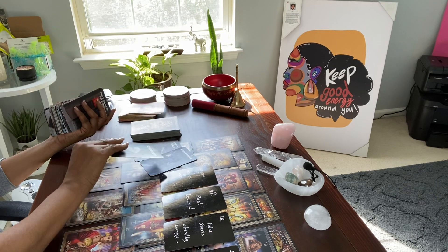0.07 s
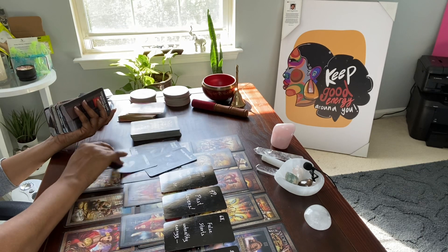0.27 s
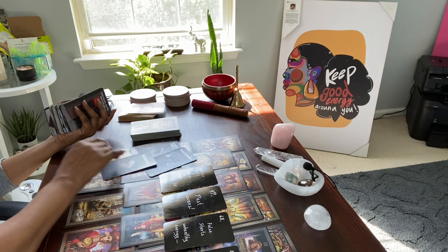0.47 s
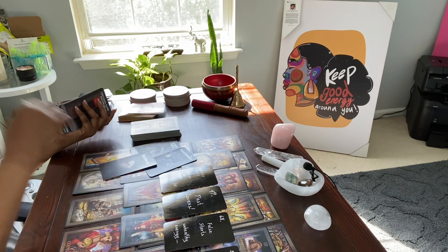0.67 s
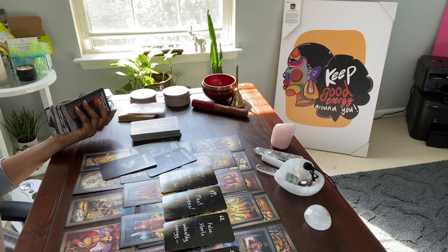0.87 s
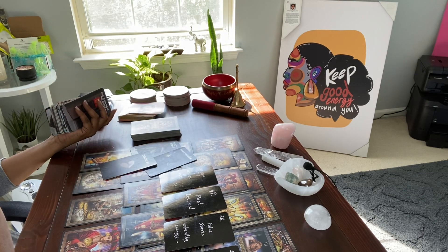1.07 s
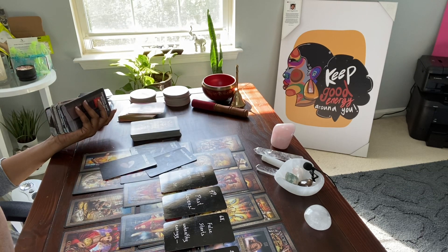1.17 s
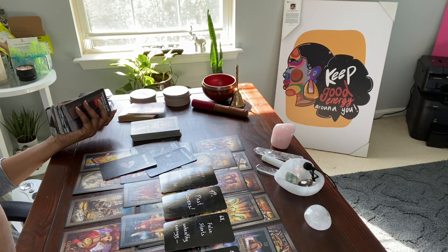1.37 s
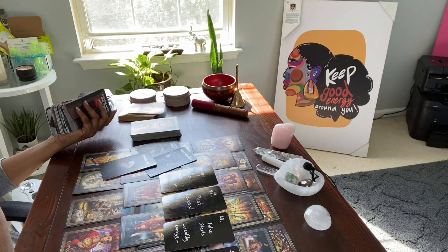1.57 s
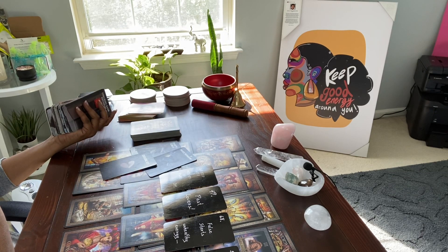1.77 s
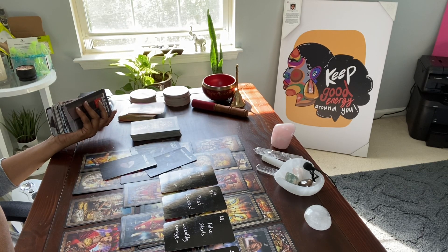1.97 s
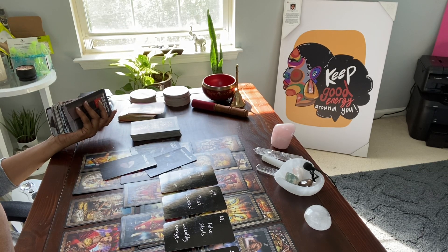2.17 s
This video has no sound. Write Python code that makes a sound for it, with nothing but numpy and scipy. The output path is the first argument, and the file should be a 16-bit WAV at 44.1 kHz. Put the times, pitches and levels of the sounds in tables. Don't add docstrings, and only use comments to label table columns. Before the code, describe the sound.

A playing card slaps onto a wooden table at about 0.32 seconds, after faint ticks and papery scuffs from 0.2. The snap is bright and crackly, with a short woody boom and brief room reflections. Then quiet: soft fan hum, low air rumble, a dull thud near 1.06, faint falling bird whistles until about 1.65, a small deck tick at 1.34, and light ticks and hand rustle from 2.0 to 2.2.

```python
import sys
import numpy as np
from scipy import signal
from scipy.fft import rfft, irfft
from scipy.io import wavfile
from scipy.ndimage import uniform_filter1d

SR = 44100
rng = np.random.default_rng(int(sys.argv[2]) if len(sys.argv) > 2 else 0)


def store_pcm(level_fs):
    pcm = np.round(np.clip(level_fs, -1, 1) * 32767).astype(np.int16)
    wavfile.write(sys.argv[1], SR, np.atleast_2d(pcm).T)


def how_loud(loudness_db):
    steps = np.asarray(loudness_db, float) / 20
    return 10 ** steps


N = 98166


def rms_one(x):
    return x / np.sqrt(np.mean(x ** 2) + 1e-20)


def at_hz(points, hz):
    table_hz, value = np.array(points).T[:2]
    return np.interp(np.log(hz), np.log(table_hz), value)


def colour(x, spectrum):
    hz = np.maximum(np.fft.rfftfreq(len(x), 1 / SR), 1)
    return rms_one(irfft(rfft(x) * how_loud(at_hz(spectrum, hz)), len(x)))


def band_noise(low_hz, high_hz, order, n):
    sos = signal.butter(order, [low_hz, high_hz], "band", fs=SR, output="sos")
    return signal.sosfilt(sos, rng.standard_normal(n))


def click(s, db):
    x = np.full(N, 1e-18)
    x[int(s * SR)] = how_loud(db)
    return x


def ring(clicks, hz, t60):
    r, w = how_loud(-60 / (t60 * SR)), 2 * np.pi * hz / SR
    return signal.lfilter([0, np.sin(w)], [1, -2 * r * np.cos(w), r * r], clicks)


def snap(s, db, hz, t60):
    t = np.arange(N) / SR - s
    crack = rng.standard_normal(N) * (t >= 0) * how_loud(db - 120 * np.maximum(t, 0) / t60)
    top_hz = min(2.0 * hz, .45 * SR)
    crackle = signal.lfilter(*signal.butter(2, top_hz, fs=SR), crack + 1e-18)
    return np.array([ring(click(s, db), hz, t60), crackle])


# [t/s, peak level/dB, card ring f/Hz, ring t60/s, push into the table level/dB]
CONTACTS = [(.3148, -8, 1700, .004, -13), (.3149, -13, 4200, .0025, -30), (.3150, -19, 8500, .002, -30),
            (.3192, -17, 1850, .010, -14), (.3202, -14, 1870, .010, -17), (.3216, -14, 14000, .0012, -30),
            (.3217, -9, 1860, .007, -18), (.3221, -6, 9400, .0024, -30), (.3239, -15, 3800, .003, -19),
            (.3254, -21, 14200, .003, -30), (.3306, -13, 5400, .004, -24), (.3322, -16, 7200, .0035, -22)]


def slap():
    return sum(snap(*row[:4]) for row in CONTACTS)


# [f/Hz, level/dB, t60/s]
TABLE = [(107, -26.5, 0.088), (219.2, -5.5, 0.028), (410, -13.5, 0.017), (508, -14, .04),
         (654.8, -15.5, 0.038), (745, -18.5, .05), (836, -20.5, .05), (1175, -10, 0.018),
         (1359.7, -19.5, 0.034)]


def table():
    pushes = sum(click(row[0], row[4]) for row in CONTACTS)
    soft_push = signal.lfilter([.2], [1, -.8], pushes)
    modes = sum(how_loud(db) * ring(soft_push, hz, t60) for hz, db, t60 in TABLE)
    return signal.lfilter(*signal.butter(2, 120, "high", fs=SR), modes)


# [t/s, peak level/dB, ring f/Hz, ring t60/s]
TICKS = [(.2018, -42, 3500, .008), (.2065, -50, 6500, .006), (.2020, -48, 900, .012),
         (.2110, -48, 4000, .010), (.2365, -48, 1850, .012), (.2783, -33, 2300, .010),
         (.2851, -39, 7200, .004), (.2851, -38, 2300, .005), (.3095, -30, 2900, .008),
         (1.3425, -42, 520, .030), (1.3428, -41, 800, .012), (1.3430, -51, 2300, .010),
         (1.9865, -46, 2200, .010), (1.9865, -48, 6400, .004), (1.9868, -49, 8900, .003),
         (2.0755, -53, 6500, .005)]


def ticks():
    rings, cracks = sum(snap(*row) for row in TICKS)
    return rings + how_loud(-12) * cracks


# [t/s, level/dB]
SLIDE = [
    (.198, -86),
    (.203, -52.5),
    (.23, -66),
    (.262, -66.5),
    (.28, -50),
    (.298, -63.5),
    (.311, -41.5),
    (0.322, -24.5),
    (.345, -47),
]
# [f/Hz, level/dB per Hz]
CARD = [(500, -13.5), (1200, 4), (2300, 7), (3500, -4.5), (7000, -5), (11000, -13), (15000, -19.5)]


def slide():
    grains_per_s, spread_db, end_s = 8000, 2.5, .012
    t, (s, db) = np.arange(N) / SR, np.transpose(SLIDE)
    hits = rng.random(N) < grains_per_s / SR
    sizes = how_loud(spread_db * np.minimum(rng.exponential(1, N), 4))
    grains = hits * sizes * rng.choice([-1, 1], N)
    stroke = how_loud(np.interp(t, s, db, left=-140)) * np.exp(-np.maximum(t - s[-1], 0) / end_s)
    return stroke * colour(grains, CARD)


# [f/Hz, t60/s]
ROOM_T60 = [(100, .17), (500, .2), (2000, .22), (5000, .21), (8000, .19), (11000, .145), (16000, .11)]
# [f/Hz, level/dB]
ROOM = [(100, -4.5), (300, 1.5), (1000, 3.5), (1500, 0), (2200, -1), (3200, -2), (5000, 4), (10000, -0.5),
        (16000, -2.5)]


def room(x):
    late_db, late_stretch = -12, 1.7
    peak_hz, peak_width_hz, peak_db = 2020, 350, -2
    onset_s, room_db = .009, -4
    t, edges = np.arange(SR // 2) / SR, 70 * 2 ** np.arange(0, 8.1, .5)
    tail = 0
    for low, high in zip(edges, edges[1:]):
        hz = np.sqrt(low * high)
        fall_db = -60 * t / at_hz(ROOM_T60, hz)
        decay = how_loud(fall_db) + how_loud(late_db + fall_db / late_stretch)
        tail = tail + band_noise(low, high, 2, len(t)) * how_loud(at_hz(ROOM, hz)) * decay
    peak = signal.iirpeak(peak_hz, peak_hz / peak_width_hz, fs=SR)
    tail = tail + how_loud(peak_db) * signal.lfilter(*peak, tail)
    tail = tail * (1 - np.exp(-(t / onset_s) ** 2))
    return how_loud(room_db) * signal.fftconvolve(x, tail / np.linalg.norm(tail))[:N]


# [middle t/s, half length/s, level/dB]
RUSTLES = [
    (1.25, 0.06, -83),
    (1.875, .05, -97),
    (2.01, .02, -85),
    (2.14, 0.028, -65),
    (2.21, .02, -68),
]
# [f/Hz, level/dB per Hz]
CLOTH = [(700, 6.5), (2200, 6.5), (4000, -2), (7000, 0), (10000, -10), (15000, -19)]


def rustles():
    t = np.arange(N) / SR
    swells = sum(how_loud(db) * np.exp(-((t - s) / half) ** 2) for s, half, db in RUSTLES)
    return swells * colour(rng.standard_normal(N), CLOTH)


# [start t/s, length/s, start f/Hz, end f/Hz, level/dB]
WHISTLES = [
    (.02, .17, 2840, 2420, -70),
    (.565, .185, 2830, 2440, -70),
    (.81, .09, 2170, 2080, -76),
    (.90, .07, 2780, 2850, -77),
    (1.02, .13, 2830, 2430, -70),
    (1.485, .08, 3420, 3030, -76),
    (1.565, .09, 2440, 2420, -71),
    (1.57, .07, 3120, 3080, -79),
    (1.28, .34, 2830, 2740, -81),
]


def bird():
    hold_share, fade_db, edge_s = .2, -2.5, .012
    dip_at, dip_width, dip_db = .62, .25, -5
    echo_s, echo_db, warble_hz = .11, -3, 25
    t, out = np.arange(N) / SR, 0
    warble = warble_hz * rms_one(uniform_filter1d(rng.standard_normal(N), size=300))
    for s, length, start_hz, end_hz, db in WHISTLES:
        u = np.clip((t - s) / length, 0, 1)
        gate = np.clip(np.minimum(t - s, s + length - t) / edge_s, 0, 1)
        glide = np.sin(np.pi / 2 * np.clip((u - hold_share) / (1 - hold_share), 0, 1)) ** 2
        hz = start_hz + (end_hz - start_hz) * glide + warble
        level = how_loud(db + fade_db * u + dip_db * np.exp(-((u - dip_at) / dip_width) ** 2))
        out = out + level * np.sqrt(2) * gate * np.sin(2 * np.pi * np.cumsum(hz) / SR)
    t = np.arange(SR // 2) / SR
    echoes = rng.standard_normal(len(t)) * np.exp(-t / echo_s)
    return out + how_loud(echo_db) * signal.fftconvolve(out, echoes / np.linalg.norm(echoes))[:N]


# [t/s, level/dB]
DRAUGHT = [(0.0, -37), (0.49, -42), (0.56, -30), (0.61, -44), (0.71, -34), (0.77, -46), (0.81, -33),
           (0.95, -44), (1.0, -30), (1.54, -47), (1.64, -35), (2.0, -59), (2.05, -38), (2.22, -40)]
# [t/s, peak level/dB, f/Hz, half length/s]
THUDS = [
    (.335, -33, 32, .03),
    (1.00, -35, 36, .025),
    (1.062, -24, 23, .04),
]


def draught():
    t, (s, db) = np.arange(N) / SR, np.transpose(DRAUGHT)
    rocking = band_noise(8, 19, 3, N + SR)[SR:]
    flutter = band_noise(19, 36, 3, N + SR)[SR:]
    rocking = rocking / np.sqrt(uniform_filter1d(rocking ** 2, size=6000))
    thuds = 0
    for s0, peak_db, hz, half in THUDS:
        swell = np.exp(-((t - s0) / half) ** 2)
        thuds = thuds + how_loud(peak_db) * swell * np.cos(2 * np.pi * hz * (t - s0))
    return how_loud(1 + np.interp(t, s, db)) * rms_one(rocking) + how_loud(-56.5) * rms_one(flutter) + thuds


# [f/Hz, level/dB per Hz]
FLOOR = [(45, 8), (110, -10), (200, -9), (420, -22.5), (900, -20.5), (2200, -33), (4000, -40), (7000, -39)]
# [f/Hz, width/Hz, level/dB]
HUM = [
    (98, 28, -64),
    (248.1, 11, -59),
    (301.1, 16, -64.5),
    (352.9, 18, -69),
]


def background():
    hum_start_db, hum_settle_s = 7, .25
    hum = 0
    for hz, width, db in HUM + [(2780, 220, -84)]:
        once = ring(rng.standard_normal(N), hz, 1.6 / width)
        hum = hum + how_loud(db) * rms_one(ring(once, hz, 1.1 / width))
    settle = how_loud(hum_start_db * np.exp(-(np.arange(N) / SR / hum_settle_s) ** 2))
    hiss = colour(rng.standard_normal(N), [(14, -31)] + FLOOR + [(16000, -49)])
    return how_loud(-54.5) * hiss + hum * settle


def scene():
    rings, cracks = slap()
    wood, small = table(), ticks() + slide()
    to_room = how_loud(-14) * rings + how_loud(-11) * cracks + how_loud(-3.5) * wood + how_loud(-2.5) * small
    to_room = to_room + click(.321, 3.5)
    close = rings + how_loud(-5) * cracks + wood + small
    return (close + room(to_room) + rustles() + bird() + draught() + background())[None]


def top_cut(x):
    return signal.sosfilt(signal.butter(12, 16690, fs=SR, output="sos"), x)


def record(dry):
    end_s, fade_s, top_hz = 2.226, .004, 16800
    faded = dry * np.clip((end_s - np.arange(N) / SR) / fade_s, 0, 1)
    mix = signal.sosfilt(signal.cheby2(12, 70, top_hz, fs=SR, output="sos"), faded)
    return top_cut(mix)


dry = scene()
out = record(dry)
store_pcm(out)
```